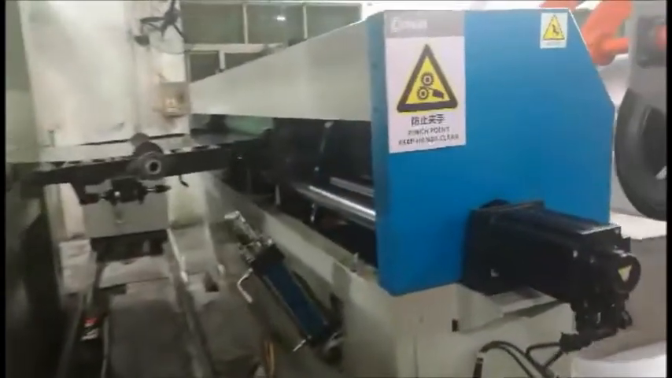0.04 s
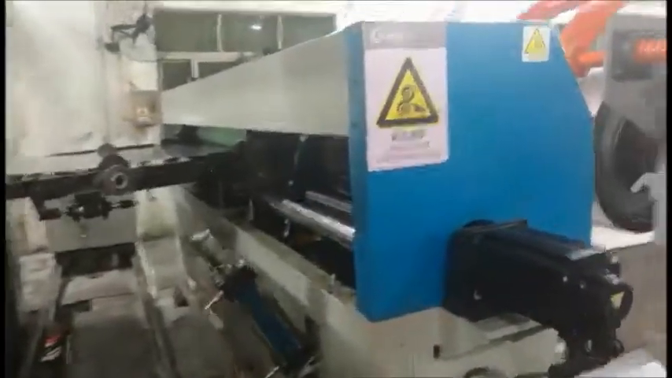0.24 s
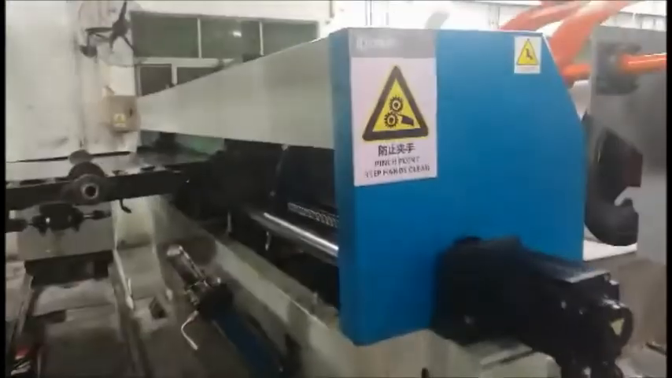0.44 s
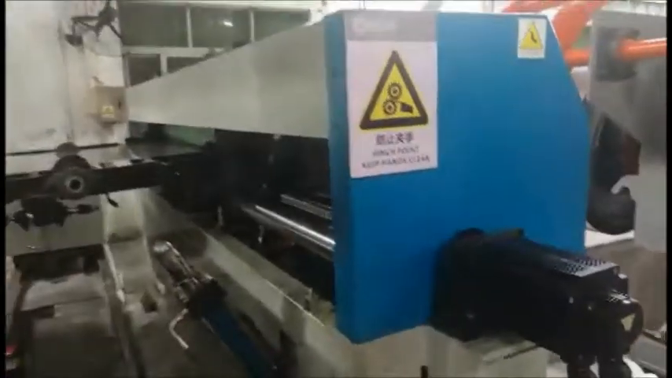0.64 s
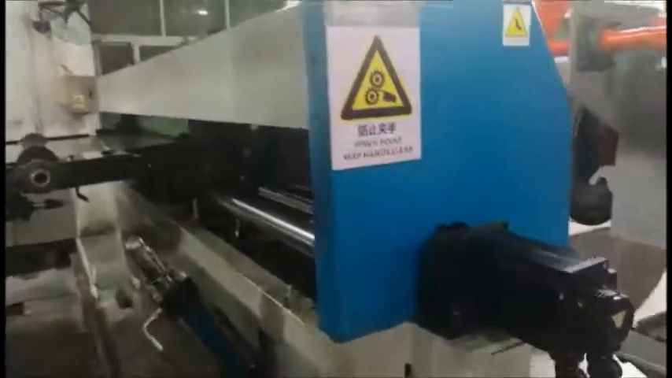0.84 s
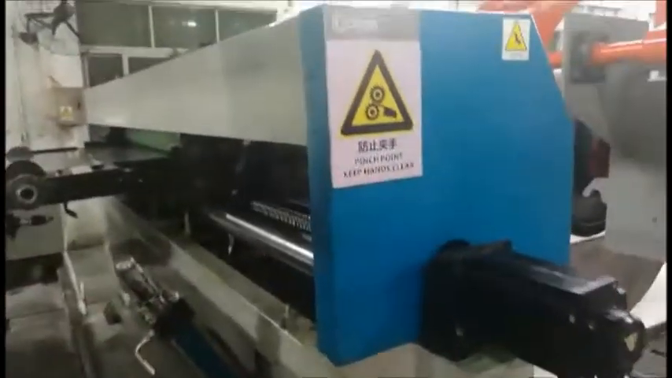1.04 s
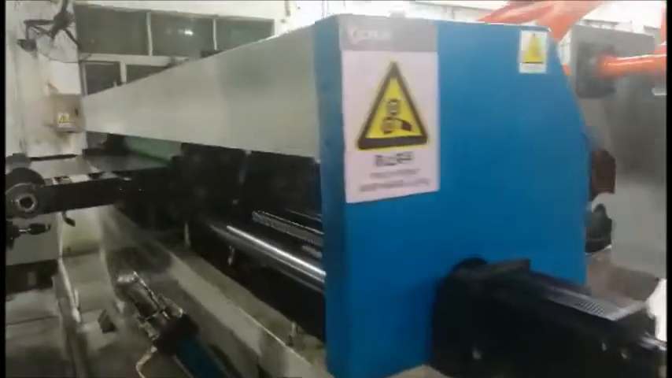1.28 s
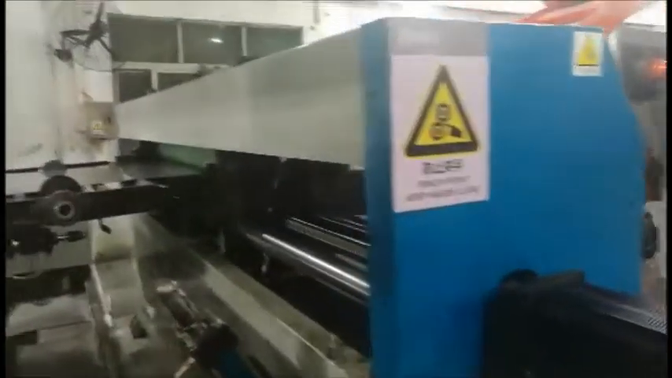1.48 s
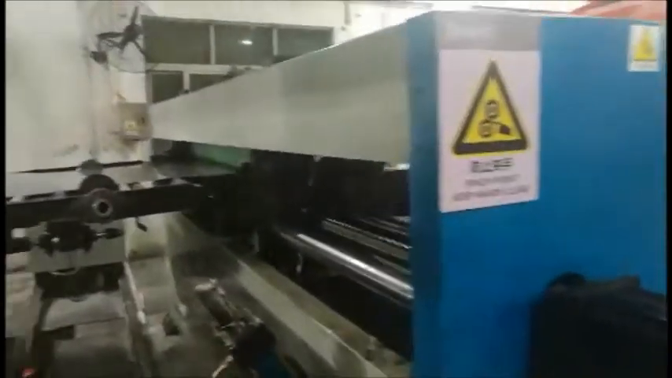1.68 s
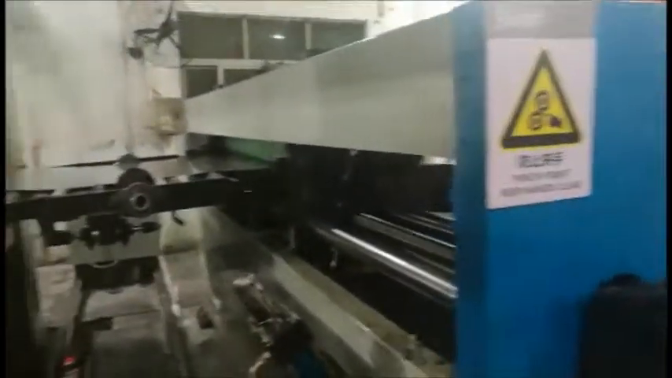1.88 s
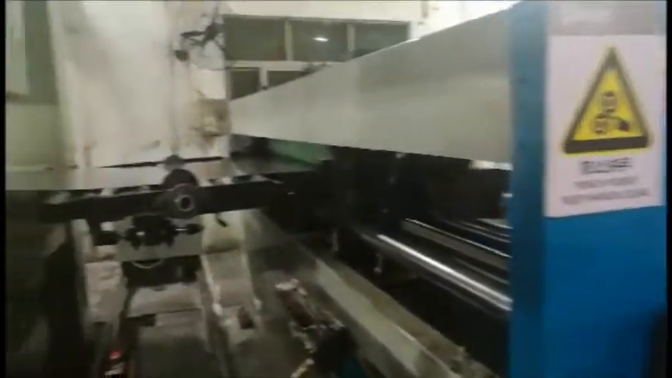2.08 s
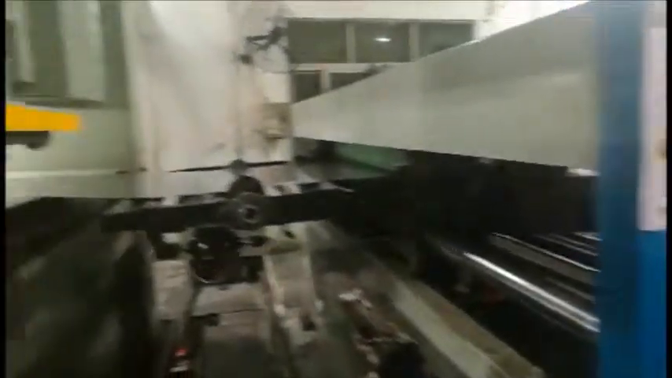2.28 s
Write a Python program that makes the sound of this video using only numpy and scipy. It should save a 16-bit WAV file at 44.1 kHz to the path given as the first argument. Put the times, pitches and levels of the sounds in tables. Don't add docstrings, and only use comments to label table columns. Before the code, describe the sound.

A power press strikes sheet metal twice with hard, ringing bangs in a large humming factory hall

```python
import sys
import numpy as np
from scipy import signal
from scipy.fft import rfft, irfft
from scipy.io import wavfile
from scipy.ndimage import uniform_filter1d

SR = 44100
rng = np.random.default_rng(int(sys.argv[2]) if len(sys.argv) > 2 else 0)


def digitize_waveform(pressure):
    field = np.atleast_2d(pressure).T
    bounded = np.clip(field, -1, 1)
    quanta = np.round(bounded * 32767).astype(np.int16)
    wavfile.write(sys.argv[1], SR, quanta)


def voltage_ratio(decibels):
    exponent = np.asarray(decibels, float) / 20
    return 10 ** exponent


N = 101430

# f/Hz, likeness [0 to 1]
LIKENESS = [(60, .997), (150, .975), (290, .85), (450, .75), (600, .68), (800, .35), (1100, .1),
            (14000, .04)]
# f/Hz, lead/rad
LEFT_LEAD = [(100, .0), (200, -.25), (300, -.7), (450, -1.6), (600, -2.5), (900, -3.2), (14000, -3.3)]


def evened(x):
    return x / np.sqrt(np.mean(x ** 2) + 1e-20)


def read(points, hz):
    f, value = np.transpose(points)
    return np.interp(np.log(hz + 1), np.log(f + 1), value)


def likeness(hz):
    return np.clip(read(LIKENESS, hz), 0, 1)


def add(mix, s, sound):
    part = mix[..., round(s * SR):][..., :sound.shape[-1]]
    part += sound[..., :part.shape[-1]]


def onset(t, rise_s):
    return np.minimum(t / rise_s, 1)


def dying_tone(t, hz, db, t60):
    return voltage_ratio(db - 60 * t / t60) * np.sin(2 * np.pi * hz * t)


def tilt(db_per_octave, hz):
    return db_per_octave * np.log2(hz / 500 + 1)


def noise(size, field):
    window, hop = 1024, 256
    frames = size // hop + 5
    hz = np.fft.rfftfreq(window, 1 / SR)[:, None]
    a, b, c, d = rng.standard_normal((frames, window // 2 + 1, 4)).T
    same = likeness(hz)
    left, other = a + 1j * b, c + 1j * d
    right = same * left * np.exp(-1j * read(LEFT_LEAD, hz)) + np.sqrt(1 - same ** 2) * other
    z = np.array([left, right]) * voltage_ratio(field(hz, np.arange(frames) * hop / SR))
    return evened(signal.istft(z, nperseg=window, noverlap=window - hop)[1][:, :size])


def ring(modes, t):
    hz, db, t60 = np.transpose(modes)[..., None]
    turn, sign = rng.random((2, len(modes), 1))
    apart = (read(LEFT_LEAD, hz) + np.arccos(likeness(hz)) * np.sign(sign - .5)) / 2
    level = voltage_ratio(db - 60 * t / t60)
    phase = 2 * np.pi * (hz * t + turn)
    return np.array([(level * np.sin(phase + side * apart)).sum(0) for side in (1, -1)])


def press():
    # t/s, level/dB, brightness/(dB per octave), sheet knock f/Hz, knock level/dB
    strokes = [
        (.2394, -13, 0.28, 981, -19.5),
        (1.6895, -14.5, 0, 828, -17),
    ]
    # delay/s, clatter level/dB, ring level/dB, clatter t60/s, brightness/(dB per octave)
    blows = [
        (-.013, -15, -11, .08, 2.5),
        (-.005, -8, -2, .06, 4.3),
        (.001, 4.5, -2, 0.13, 1.47),
        (.012, -5, -2.5, .1, 6.7),
        (.022, 0.5, -42, .14, 0.7),
        (.034, -5, 4, .15, 3.8),
        (.062, -2.5, 9, .2, -5),
    ]
    # f/Hz, level/(dB per Hz)
    clatter = [(45, -25.5), (160, -20.5), (380, -12), (450, -12), (1100, -3), (2500, -11.5), (7000, -29),
               (14000, -31.5)]
    # f/Hz, level/dB, t60/s
    die = [(145.6, -6, 0.15), (178, -2.5, 0.13), (294.3, -6.5, 0.09), (315, -1, 0.19), (377, -3.5, 0.06),
           (806, -7, 0.11), (939.3, -2, 0.11), (984, -9, 0.075), (1090, -40, 0.059), (1336, -12, 0.043),
           (1492, -11, 0.19), (2080, -10, 0.097), (2560, -17, .07)]
    die_db, frame_db = -0.5, -29
    crash, tones = np.zeros((2, N)), np.zeros((2, N))
    t = np.arange(SR // 2) / SR
    for start, level_db, bright_db, knock_hz, knock_db in strokes:
        for delay, clatter_db, ring_db, t60, tilt_db in blows:
            slope = lambda hz: tilt(bright_db + tilt_db, hz)
            rise = voltage_ratio(level_db) * onset(t, .003)
            rattle = noise(SR // 2, lambda hz, _: read(clatter, hz) + slope(hz))
            add(crash, start + delay, rise * voltage_ratio(clatter_db - 60 * t / t60) * rattle)
            modes = [(hz, db + slope(hz), decay) for hz, db, decay in die]
            add(tones, start + delay, rise * voltage_ratio(die_db + ring_db) * ring(modes, t) / 2)
        thud = -dying_tone(t, hz=176.4, db=-2, t60=0.022) * onset(t, 0.0011)
        boom = dying_tone(t, hz=56.5, db=-13.5, t60=0.099) * onset(t, 0.017)
        add(crash, start + .031, voltage_ratio(level_db + 16) * thud)
        add(crash, start + .0091, voltage_ratio(level_db + 22.5) * boom)
        add(tones, start, voltage_ratio(level_db - strokes[0][1] + frame_db) * frame_ring())
        knock = dying_tone(t, knock_hz, knock_db, t60=0.24) * onset(t, 0.012)
        add(tones, start + 0.0083, knock)
    return crash, tones


def frame_ring():
    # f/Hz, width/Hz, level/dB, t60/s
    resonances = [(157, 8, -2, 2.4), (180, 8, .5, 1.2), (248, 7, -2.5, 2.2), (318, 7, 1, 1.8),
                  (362, 7, -5, 2.2), (396, 7, -8, 1.4)]
    t = np.arange(2 * SR) / SR
    spread = np.arange(-2, 3) / 2 + rng.uniform(-.2, .2, (len(resonances), 5))
    modes = []
    for (hz, width, db, t60), offsets in zip(resonances, spread):
        modes += [(hz + width * u, db - 6 * abs(u), t60) for u in offsets]
    return ring(modes, t) * onset(t, .03)


def valves():
    # t/s, level/dB, hold/s, t60/s, brightness/(dB per octave)
    puffs = [(0.163, -43, 0.061, .2, -1), (0.304, -34.5, 0.028, 0.33, -3),
             (0.414, -28.5, 0.016, 0.13, -1.5), (0.473, -38.5, 0.021, 0.44, -9),
             (.645, -27, 0.0051, 0.25, -0.4), (0.797, -34, .03, 0.69, -9), (1.553, -34.5, 0.011, 0.46, 1),
             (1.719, -26.5, 0.042, 0.42, -3), (1.821, -37, 0.066, 0.31, -1), (2.264, -34, 0.0096, .3, -5.5),
             (2.29, -31.5, 0.0013, .3, -2)]
    # f/Hz, level/(dB per Hz)
    air = [(300, -26), (1500, 4), (3000, 0), (5500, 1), (7500, -2), (9500, -1), (12000, -0.2),
           (14500, -7.8)]
    out, t = np.zeros((2, N)), np.arange(SR // 2) / SR
    for s, db, hold, t60, tilt_db in puffs:
        rise_s = .007 + .2 * hold
        hiss = noise(SR // 2, lambda hz, _: read(air, hz) + tilt(tilt_db, hz))
        dying = voltage_ratio(db - 60 * np.maximum(t - rise_s - hold, 0) / t60)
        add(out, s, hiss * onset(t, rise_s) * dying)
    return out


def ticks():
    # t/s, level/dB, f/Hz, left-right/dB
    clicks = [
        (0.1752, -41.5, 2840, 14.5),
        (.615, -30, 546, 3),
        (1.641, -41, 3700, -6.5),
    ]
    out, t = np.zeros((2, N)), np.arange(SR // 5) / SR
    for s, db, hz, pan_db in clicks:
        cluster = [(hz * k, db, .06) for k in (.94, 1, 1.07)]
        pan = voltage_ratio(np.array([[.5], [-.5]]) * pan_db)
        add(out, s, ring(cluster, t) * onset(t, 0.00033) * pan)
    return out


def hall(x, t60_of, seconds):
    # f/Hz, level/dB
    colour = [(55, -2), (105, -9), (150, -1.5), (350, 0.5), (500, 7.5), (1000, -0.5), (3000, -3.5),
              (14000, 1.5)]
    size = round(seconds * SR)
    tail = noise(size, lambda hz, t: read(colour, hz) - 60 * t / t60_of(hz))
    tail = tail * onset(np.arange(size), 0.011 * SR)
    return signal.fftconvolve(x[:1], tail / np.sqrt(size), axes=1)[:, :N]


def machine_hum():
    # f/Hz, level/dB
    broad = [(45, -1), (120, -3.5), (400, -4), (480, -7.5), (900, -5.5), (1700, -6.5), (6500, -19),
             (14000, -23.5)]
    # f/Hz, width/Hz, level/dB (negative is a dip)
    peaks = [(157, 32, -5), (280, 19, 14.5), (340, 16, 3.5), (780, 62, 8.5)]
    level_db, patch_db = -38, 2.5

    def field(hz, t):
        grain = rng.standard_normal((len(t), len(hz)))
        patches = evened(uniform_filter1d(uniform_filter1d(grain, 10, 0), 8, 1)).T
        patches = patch_db * patches * hz / (hz + 400)
        return read(broad, hz) + patches + sum(db / (1 + ((hz - f) / w) ** 2) for f, w, db in peaks)

    return voltage_ratio(level_db) * noise(N, field)


def scene():
    # f/Hz, t60/s
    hall_decay = [(50, 2.8), (150, 2.59), (350, 3.72), (800, 2.87), (2000, 2.84), (5000, 2.25),
                  (14000, 1.6)]
    crash, tones = press()
    small = valves() + ticks()
    send = crash + voltage_ratio(-9) * tones + voltage_ratio(-3.5) * small
    late = voltage_ratio(-2) * hall(send, lambda hz: read(hall_decay, hz), seconds=3.1)
    early = voltage_ratio(-5.5) * hall(send, lambda hz: 0.37 + 0 * hz, seconds=.6)
    return crash + tones + small + late + early + machine_hum()


def band_limit(x):
    return signal.sosfilt(signal.butter(12, 15270, fs=SR, output="sos"), x)


def record(dry):
    # f/Hz, left-right/dB
    sides = [(60, 0), (180, .3), (350, .8), (700, -2.5), (1400, 1), (5500, 2.6), (9500, -1.5), (13000, .8)]
    # f/Hz, level/dB
    colour = [(60, -0.5), (105, -2.5), (150, 2), (2300, -1.2), (4000, 0.4), (5700, 1), (6600, -2),
              (13000, 1.44)]
    ceiling, edge_hz, low_cut_hz = 1.3, 13840, 53
    hz = np.fft.rfftfreq(N, 1 / SR)
    left = voltage_ratio(read(sides, hz) / 2)
    limits = (1 + (hz / edge_hz) ** 120) * (1 + (low_cut_hz / (hz + 1)) ** 6)
    band = voltage_ratio(read(colour, hz)) / np.sqrt(limits)
    soft = ceiling * np.tanh(dry / ceiling)
    mix = irfft(rfft(soft) * band * np.array([left, 1 / left]), N)
    return band_limit(mix)


dry = scene()
out = record(dry)
digitize_waveform(out)
```